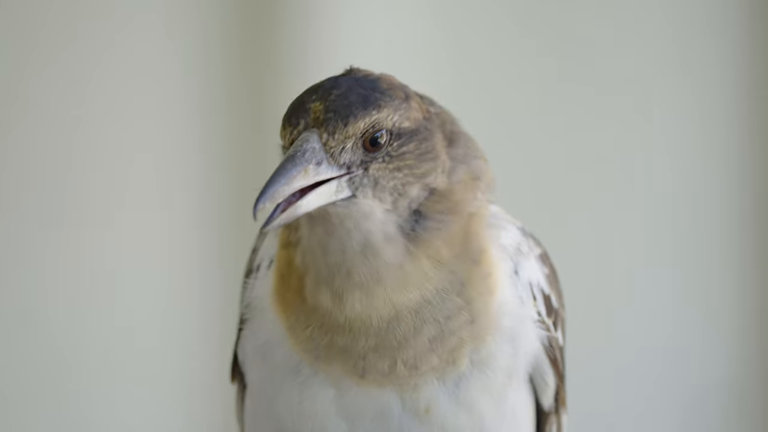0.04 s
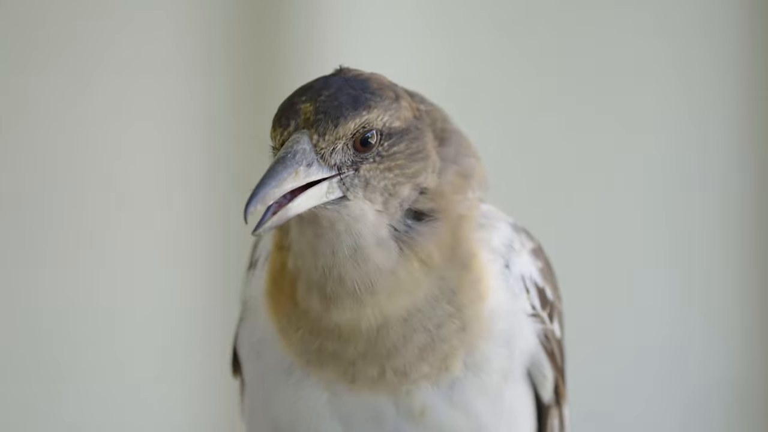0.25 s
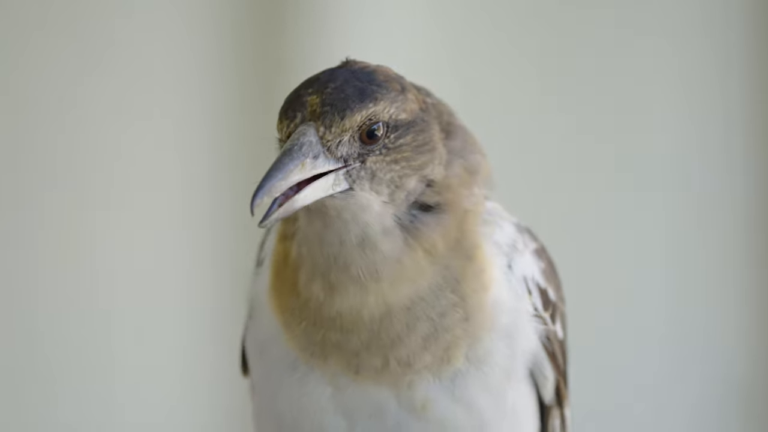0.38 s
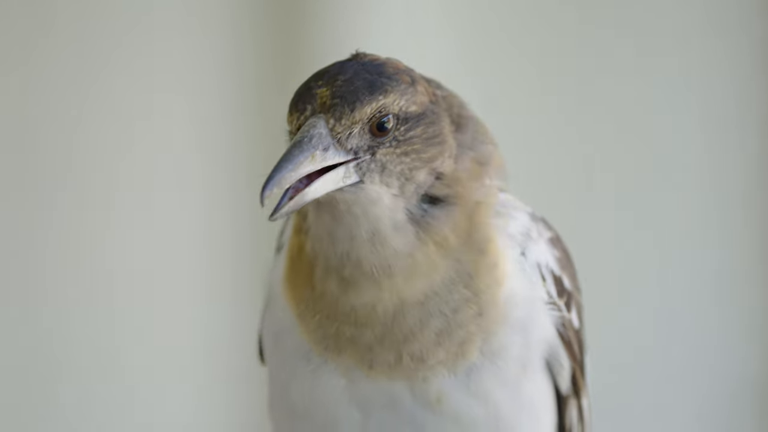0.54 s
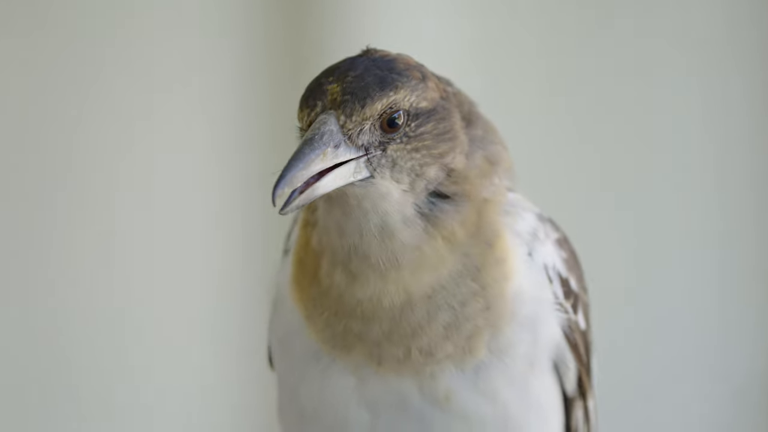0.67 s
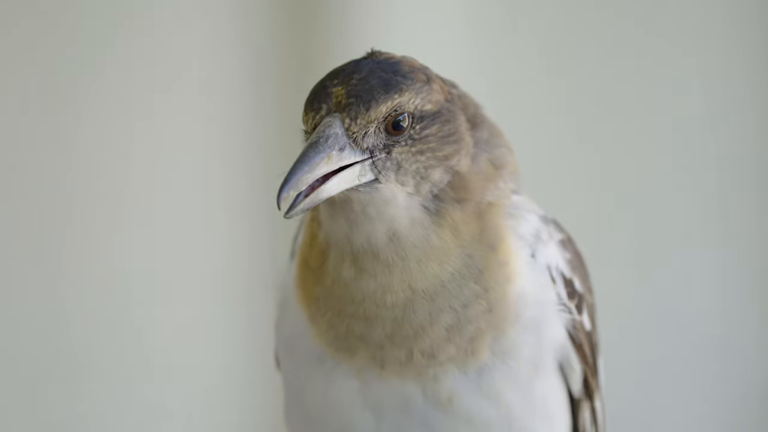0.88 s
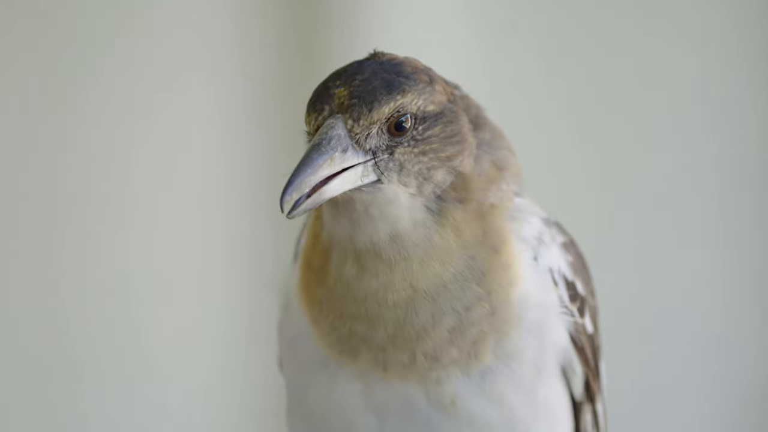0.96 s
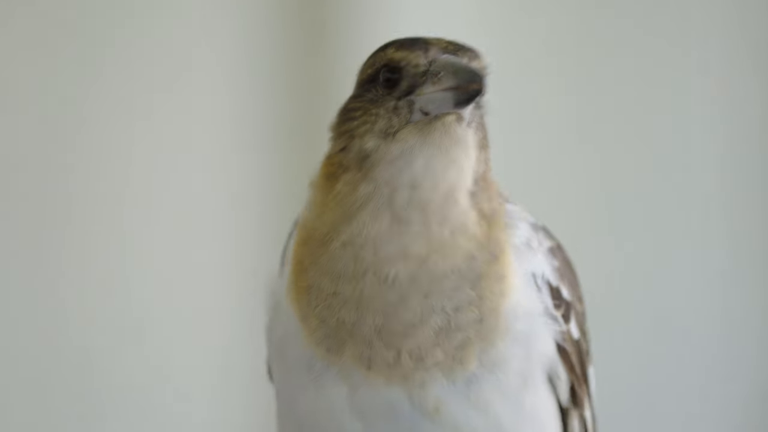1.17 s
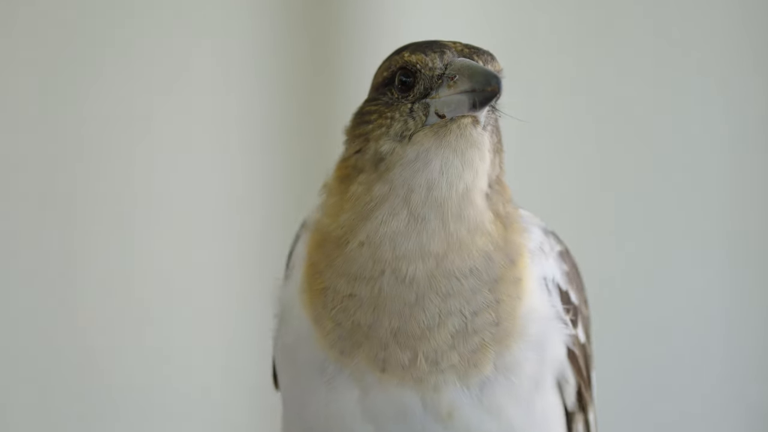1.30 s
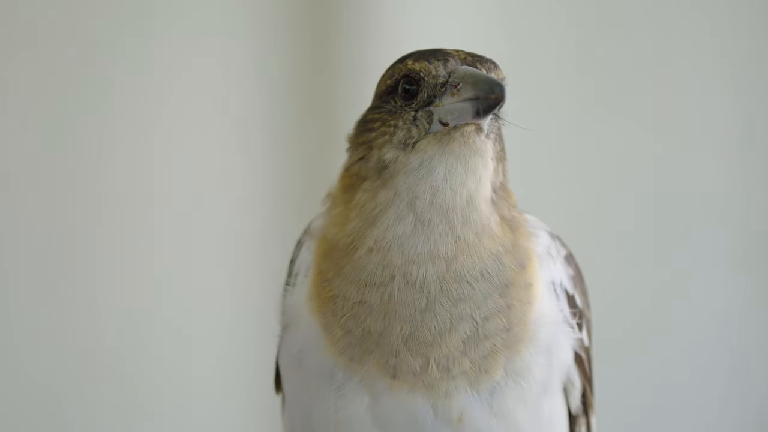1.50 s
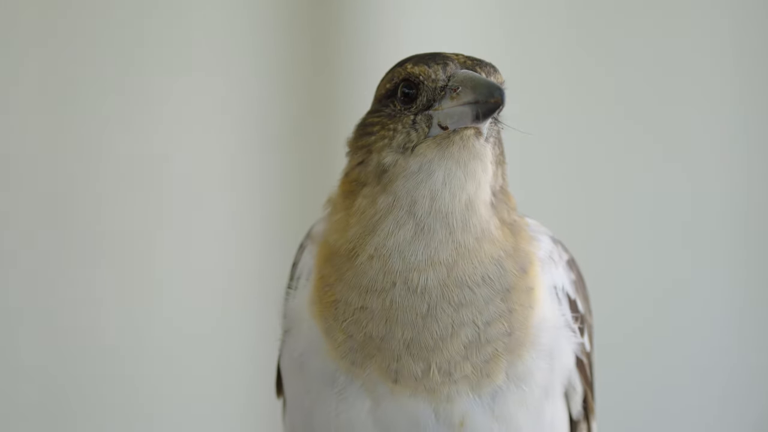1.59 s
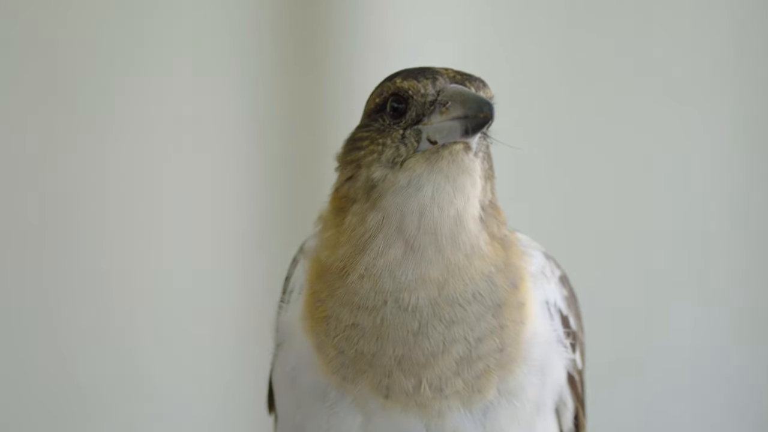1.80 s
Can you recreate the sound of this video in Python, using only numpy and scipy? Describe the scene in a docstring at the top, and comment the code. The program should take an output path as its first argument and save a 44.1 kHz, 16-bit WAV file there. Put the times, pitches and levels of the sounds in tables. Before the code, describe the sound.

A bird whistles clear, low, fluted notes in an echoing porch, then distant clattering fades in

```python
"""Low rumble, microphone hiss and two faint wavering hums, noise and sines, last throughout.
At the start the ring of a higher note dies as a decaying sine and narrow noise.
A bird whistles five near-pure fluted notes, phase-integrated sines, in a hard-walled porch that rings on.
As it stops, a distant, reverberant machine-like clatter fades in: bright noise clacks with echoing tails
over a hollow murmur of noise bands and short tones."""
import sys
import numpy as np
from scipy import signal
from scipy.fft import rfft, irfft
from scipy.io import wavfile

SR = 44100
rng = np.random.default_rng(int(sys.argv[2]) if len(sys.argv) > 2 else 0)


def materialize(psi):
    """Save the field psi as 16-bit PCM at rate SR to the path in sys.argv[1].

    A 1-D psi becomes a single channel; in a 2-D psi each row is a channel.
    """
    bounded = np.clip(np.atleast_2d(psi).T, -1, 1)
    quanta = np.round(bounded * 32767).astype(np.int16)
    wavfile.write(sys.argv[1], SR, quanta)


N = 81585
TIME_S = np.arange(N) / SR


def amp(db):
    """Logarithmic level: 20 dB is a factor of ten in amplitude."""
    return 10 ** (np.asarray(db) / 20)


def rms_one(x):
    """Power normalisation: scale to a root mean square of 1."""
    return x / np.sqrt(np.mean(x ** 2) + 1e-20)


def at_hz(points, hz):
    """Logarithmic frequency scale: interpolate a table along log frequency."""
    table = np.array(points)
    return np.interp(np.log(hz), np.log(table[:, 0]), table[:, 1])


def pan(left_minus_right_db):
    """Level difference between channels: half is given to the left, half taken from the right."""
    return amp([[left_minus_right_db / 2], [-left_minus_right_db / 2]])


def drift(rate_hz):
    """Low-pass random process: white noise through a double real pole, scaled to rms 1."""
    settling = 8000  # samples dropped while the filter fills
    r = np.exp(-2 * np.pi * rate_hz / SR)
    slow = signal.lfilter([1], [1, -2 * r, r * r], rng.standard_normal(N + settling))
    return rms_one(slow[settling:])


def resonate(x, hz, width_hz):
    """Damped resonance: a pole pair whose radius sets the bandwidth, gain about 1 at the peak."""
    r = np.exp(-np.pi * width_hz / SR)
    zeros = np.array([1, 0, -1]) * (1 - r * r) / 2
    poles = [1, -2 * r * np.cos(2 * np.pi * hz / SR), r * r]
    return signal.lfilter(zeros, poles, x)


def resonate_twice(x, hz, width_hz):
    """Cascaded resonance: two equal filters in series give steeper skirts."""
    return resonate(resonate(x, hz, width_hz), hz, width_hz)


# Correlation of the channels in floor and murmur: (frequency [Hz], left-right likeness [-1 to 1])
CHANNEL_LIKENESS = [(60, 1.0), (130, 1.0), (290, 0.99), (640, 0.77), (1410, -0.16), (3100, -0.34),
                    (6820, -0.21), (15000, 1)]
# Level balance of all coloured noise: (frequency [Hz], left minus right [dB])
CHANNEL_BALANCE = [(60, -0.5), (180, 0.5), (550, -1.5), (1650, -5.5), (4970, -0.5), (15000, -10)]
CLATTER_LIKENESS = .35  # left-right likeness of lagged noise


def coloured_noise(spectrum, patchy_db, per_s, left_lag_s=0):
    """Spectral shaping and partial coherence: mid and side noise mixed to stereo, rms 1."""
    hz = np.maximum(np.fft.rfftfreq(N, 1 / SR), 1)
    alike = CLATTER_LIKENESS if left_lag_s else np.clip(at_hz(CHANNEL_LIKENESS, hz), -1, 1)
    mid, side = rfft(rng.standard_normal((2, N))) * amp(at_hz(spectrum, hz))
    common = np.sqrt(1 + alike) * mid
    opposed = np.sqrt(1 - alike) * side * np.array([[1], [-1]])
    both = amp(np.outer([.5, -.5], at_hz(CHANNEL_BALANCE, hz))) * (common + opposed)
    both = both * np.exp(-2j * np.pi * np.outer([left_lag_s, 0], hz))  # a delay is a phase slope
    if not patchy_db:
        return rms_one(irfft(both, N))
    band = np.floor(2 * np.log2(hz / 100)).clip(0, 9)  # half octaves, with open bottom and top bands
    out = np.zeros((2, N))
    for k in range(10):
        depth_db = patchy_db * (1 if k < 9 else .4)  # the top band flickers less
        out += irfft(both * (band == k), N) * amp(depth_db * drift(per_s))
    return rms_one(out)


# Relative spectrum of rumble and hiss: (frequency [Hz], density [dB per Hz])
FLOOR_SPECTRUM = [(18, -27), (30, 6), (60, 1), (100, -2), (140, -17), (300, -32.5), (600, -39), (2000, -45),
                  (4000, -52), (9500, -51.5), (16000, -65)]
# Faint tones: (frequency [Hz], median peak level [dB])
HUMS = [(100, -63), (345, -80.5)]
FLOOR_DB, HUM_WAVER_DB, HUM_WAVER_HZ = -50.5, 5.4, 8


def floor():
    """Superposition: steady coloured noise plus sines of randomly modulated amplitude."""
    out = amp(FLOOR_DB) * coloured_noise(FLOOR_SPECTRUM, 0, 0)
    for hz, db in HUMS:
        out += amp(db + HUM_WAVER_DB * drift(HUM_WAVER_HZ)) * np.sin(2 * np.pi * hz * TIME_S)
    return out


# Relative spectrum of the hollow bed: (frequency [Hz], density [dB per Hz])
MURMUR_SPECTRUM = [(88, -37.5), (150, -2.5), (193, -5.5), (334, -9), (662, -13.5), (745, -6.5), (923, -4.5),
                   (1170, -16), (1630, -9), (2450, -16), (3490, -15), (3770, -20), (9080, -21),
                   (16000, -26)]
# Level of the bed: (time [s], rms level [dB])
MURMUR_LEVEL = [(.94, -100), (.985, -60.5), (1.1, -54.5), (1.3, -55), (1.6, -53), (1.85, -58)]
# Short hollow tones: (start [s], length [s], frequency [Hz], level before panning [dB])
HOOTS = [(1.024, 0.036, 1656, -61), (1.118, 0.049, 900, -64), (1.068, 0.033, 474, -65),
         (1.16, 0.1, 375, -56), (1.216, 0.078, 256.6, -65), (1.249, 0.028, 812, -55),
         (1.279, .07, 309.7, -57), (1.388, 0.056, 344, -60), (1.339, 0.041, 839, -70.5),
         (1.447, 0.079, 819.5, -56), (1.469, 0.037, 1796, -64.5), (1.569, 0.057, 900, -58),
         (1.671, .035, 953, -59.5)]
HOOT_WIDTH_HZ, HOOT_PAN_DB = 45, -3


def murmur():
    """Band-wise amplitude modulation: a patchy noise bed with short tones of sine and narrow noise."""
    level_db = np.interp(TIME_S, *np.transpose(MURMUR_LEVEL))
    out = amp(level_db) * coloured_noise(MURMUR_SPECTRUM, patchy_db=3.5, per_s=16)
    for start_s, length_s, hz, db in HOOTS:
        shape = np.sin(np.pi * np.clip((TIME_S - start_s) / length_s, 0, 1))
        breathy = rms_one(resonate(rng.standard_normal(N), hz, HOOT_WIDTH_HZ))
        tone = np.sin(2 * np.pi * hz * TIME_S) + breathy
        out += amp(db) * shape * tone * pan(HOOT_PAN_DB)
    return out


# Clacks: (time [s], level before TAIL_DB [dB], crack relative to that level [dB])
CLACKS = [(0.987, -52, -9), (1.0983, -55.5, -3.5), (1.2096, -47.5, -14), (1.2665, -38.5, -7.5),
          (1.3818, -43, -7.5), (1.4334, -42, -13), (1.543, -35, -7.5), (1.6572, -34, -8),
          (1.7747, -27, -5.5)]
# Relative spectrum of the tails: (frequency [Hz], density [dB per Hz])
TAIL_SPECTRUM = [(400, -33), (700, -4.5), (1400, -4), (1800, -12.5), (2350, -3), (3000, -7), (4500, -2.5),
                 (7000, -3.5), (11000, -8.5), (16000, -22)]
# Relative spectrum of the cracks: (frequency [Hz], density [dB per Hz])
CRACK_SPECTRUM = [(400, -20), (800, -14), (1400, -3.5), (1750, -13), (2350, -0.5), (3000, -19),
                  (4800, -4.5), (7000, -2.5), (16000, -14.5)]
CRACK_T60_S = .04
TAIL_T60_S, TAIL_DB, TAIL_HOLD_S, TAIL_RISE_S = .45, -17, 0.024, 0.0013
LEFT_LAG_S = .000136  # the clatter reaches the right channel first


def clatter():
    """Exponential decay and power addition: each clack is a short crack and a tail that holds, then dies."""
    crack_power, tail_power = np.zeros(N), np.zeros(N)
    for start_s, db, crack_db in CLACKS:
        age = np.maximum(TIME_S - start_s, 0)
        crack_level_db = db + crack_db - 60 * age / CRACK_T60_S
        crack_power += (TIME_S >= start_s) * amp(crack_level_db) ** 2
        tail_level_db = db + TAIL_DB - 60 * np.maximum(age - TAIL_HOLD_S, 0) / TAIL_T60_S
        tail_power += amp(tail_level_db) ** 2 * (1 - np.exp(-age / TAIL_RISE_S))
    cracks = np.sqrt(crack_power) * coloured_noise(CRACK_SPECTRUM, 0, 0, LEFT_LAG_S)
    tails = np.sqrt(tail_power) * coloured_noise(TAIL_SPECTRUM, 0, 0, LEFT_LAG_S)
    return cracks + tails


EARLIER_HZ, EARLIER_WIDTH_HZ = 2406, 61
EARLIER_DB, EARLIER_END_S = -50, 0.022  # level of its last swell, and that swell's end
EARLIER_TAIL_DB, EARLIER_T60_S = -50.5, 0.42


def earlier_note():
    """Narrow-band noise fluctuates by itself: the fluttering, dying ring of a higher note."""
    ring = rms_one(resonate_twice(rng.standard_normal((2, N)), EARLIER_HZ, EARLIER_WIDTH_HZ))
    swell = np.sqrt(2) * np.sin(np.pi * np.clip(TIME_S / EARLIER_END_S, 0, 1))
    last = swell * np.sin(2 * np.pi * EARLIER_HZ * TIME_S)
    return amp(EARLIER_DB) * last + amp(EARLIER_TAIL_DB - 60 * TIME_S / EARLIER_T60_S) * ring


PORCH_T60_S = 0.28


def porch_echo(x):
    """Diffuse reverberation: convolution with decaying noise, independent in the two channels."""
    t = np.arange(SR // 2) / SR
    tail = rng.standard_normal((2, len(t))) * amp(-60 * t / PORCH_T60_S) * (t > .004)
    tail /= np.sqrt(np.sum(tail ** 2, axis=1, keepdims=True))  # unit energy
    return signal.fftconvolve(x[None], tail, axes=1)[:, :N]


# Resonances near the song's pitch:
# (frequency [Hz], left level [dB], right level [dB], decay by 60 dB before the cap [s])
PORCH_MODES = [(1065, -2.5, 7.5, .45), (1060, -18, -12, 0.16), (1130.7, 0, 6.5, 0.39),
               (1185.5, 3.5, -4, 0.36), (1208.6, 2, -4.5, 0.32), (1241, 2.5, 7, 1), (1275, -7.5, 3, 0.28),
               (1213.2, -7, -7.5, 0.43), (1368, -7, -11.5, 0.43)]
DIRECT_DB = -2
LONGEST_RING_S = .36  # cap on the decay time


def porch_modes(x):
    """Modal resonance: the voice sets nearby modes ringing, and they beat against each other."""
    out = amp(DIRECT_DB) * np.array([x, x])
    for k, (hz, left_db, right_db, t60_s) in enumerate(PORCH_MODES):
        width_hz = np.log(1000) / np.pi / min(t60_s, LONGEST_RING_S)
        sign = (-1) ** k
        out += sign * amp([[left_db], [right_db]]) * resonate(x, hz, width_hz)
    return out


# One table per note, before the porch: (time [s], pitch [Hz], rms level [dB], overtone level [dB])
NOTES = [
    [(.062, 1360, -57, -78.5), (.072, 1280, -41, -67.5), (.085, 1170, -36, -60), (.11, 1200, -35, -81),
     (.125, 1280, -40.5, -66.5), (.15, 1200, -29, -74.5), (.17, 1200, -62, -91.5)],
    [(.185, 1290, -46.5, -92.5), (.21, 1245, -33, -72.5), (.24, 1200, -22.5, -58),
     (.26, 1192, -37.5, -55.5), (.285, 1178, -20.5, -50), (.31, 1194, -13, -49.5), (.328, 1186, -28, -47),
     (.345, 1192, -19.5, -56), (.367, 1206, -16.5, -45), (.385, 1205, -33.5, -58.5), (.4, 1200, -66, -97.5)],
    [(.475, 1300, -72, -99), (.495, 1235, -26.5, -73.5), (.52, 1205, -22.5, -55.5), (.55, 1191, -25.5, -45),
     (.58, 1190, -29, -56.5), (.61, 1192, -31.5, -50), (.635, 1200, -20, -68.5), (.67, 1199, -35.5, -72),
     (.7, 1203, -43, -87.5)],
    [(.745, 1300, -52.5, -95), (.765, 1235, -25, -80), (.782, 1195, -32.5, -57), (.79, 1145, -42, -84.5),
     (.798, 1057, -37, -95), (.812, 1050, -49, -91)],
    [(.815, 1200, -56.5, -82.5), (.83, 1200, -20, -56.5), (.845, 1170, -32.5, -60.5),
     (.865, 1138, -26, -65), (.885, 1150, -47, -72), (.9, 1240, -29.5, -72), (.92, 1145, -49.5, -79.5),
     (.94, 1140, -56.5, -72.5)],
]
# Harmonic series; the fundamental's row is skipped: (multiple of the pitch, relative level [dB])
OVERTONES = [(1, 0), (2, -41), (3, -62.5), (4, -59.5), (5, -47.5), (6, -42), (7, -36), (8, -31.5),
             (9, -43.5), (10, -37), (11, -39), (12, -64), (13, -61)]
# Unsteady pitch of the overtones, one value per note: (rms share of the pitch)
WOBBLES = [.025, .008, .002, .007, .005]
OVERTONE_REF_DB = -31.5  # the OVERTONES level that sounds at the note's overtone level
WOBBLE_HZ, FLUTTER_DB, FLUTTER_HZ = 46, 5, 40
SLUR_S = 0.006  # half the length of the window that smooths pitch and level
BREATH_DB, BREATH_WIDTH_HZ = -23.5, 51.6  # narrow air noise around the tone
SKIRT_DB, SKIRT_WIDTH_HZ = -44.5, 250  # wide air noise around the tone
AIR_HZ, AIR_BAND_HZ = 1170, 760  # centre and width of each filter on the air noise
OCTAVE_DB = -50  # the part of the octave that follows the fundamental


def slur(v):
    """Moving average: a bell-shaped window limits how fast pitch and level move."""
    window = np.hanning(int(2 * SLUR_S * SR))
    return signal.fftconvolve(v, window / window.sum(), "same")


def song():
    """Phase is the integral of frequency: return the near-sine voice, its air noise and its overtones."""
    s, hz, db, over_db = np.transpose(np.concatenate(NOTES))
    sounding = [(TIME_S >= note[0][0]) & (TIME_S <= note[-1][0]) for note in NOTES]
    gate = sum(sounding)
    pitch = hz[0] + slur(np.interp(TIME_S, s, hz) - hz[0])
    phase = 2 * np.pi * np.cumsum(pitch) / SR
    wobble = sum(share * on for share, on in zip(WOBBLES, sounding))
    shaky_phase = phase + 2 * np.pi * np.cumsum(pitch * wobble * drift(WOBBLE_HZ)) / SR
    level = slur(gate * np.sqrt(2) * amp(np.interp(TIME_S, s, db)))
    voice = level * np.sin(phase)

    # Slow noise on both quadratures of the tone makes a noise band around it.
    air = np.zeros(N)
    for air_db, width_hz in [(BREATH_DB, BREATH_WIDTH_HZ), (SKIRT_DB, SKIRT_WIDTH_HZ)]:
        air += amp(air_db) * (drift(width_hz) * np.sin(phase) + drift(width_hz) * np.cos(phase))
    air = resonate_twice(level * air, AIR_HZ, AIR_BAND_HZ)

    partials = np.zeros(N)
    for k, partial_db in OVERTONES:
        if k > 1:
            gain = amp(partial_db - OVERTONE_REF_DB + FLUTTER_DB * drift(FLUTTER_HZ))
            partials += gain * np.sin(k * shaky_phase + k * k)  # k * k staggers the phases
    over_level = slur(gate * amp(np.interp(TIME_S, s, over_db)))
    octave = level * amp(OCTAVE_DB) * np.sin(2 * shaky_phase)
    return voice, air, over_level * partials + octave


DIFFUSE_DB = -16  # dense echoes of the tone
OVERTONE_DIRECT_DB, OVERTONE_ECHO_DB, OVERTONE_PAN_DB = -9, -3, -2


def bird_in_porch():
    """Direct and reverberant fields: the song reaches the ear by itself, by modes and by echoes."""
    voice, air, high = song()
    whistle = porch_modes(voice + air) + porch_echo(amp(DIFFUSE_DB) * voice + air)
    overtones = amp(OVERTONE_DIRECT_DB) * high + amp(OVERTONE_ECHO_DB) * porch_echo(high)
    return whistle + pan(OVERTONE_PAN_DB) * overtones


def scene():
    """Linear superposition: the pressures of all sources add."""
    return bird_in_porch() + floor() + earlier_note() + clatter() + murmur()


def record(dry):
    """Band limitation: a steep elliptic low-pass cuts the top above 16 kHz."""
    low_pass = signal.ellip(10, .5, 80, 16000, fs=SR, output="sos")  # order, ripple dB, stopband dB, Hz
    return signal.sosfilt(low_pass, dry)


dry = scene()
out = record(dry)
materialize(out)
```